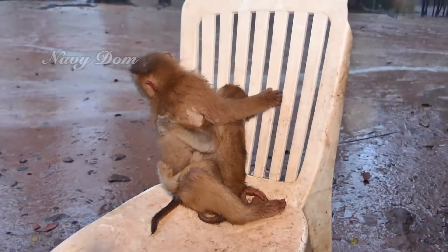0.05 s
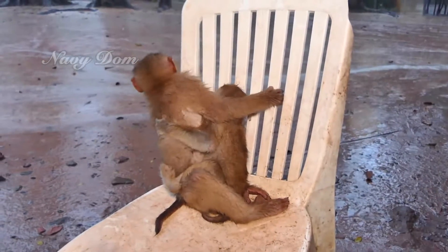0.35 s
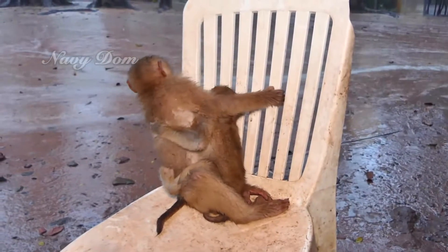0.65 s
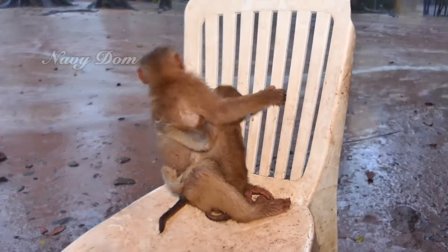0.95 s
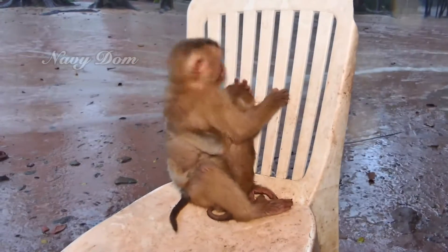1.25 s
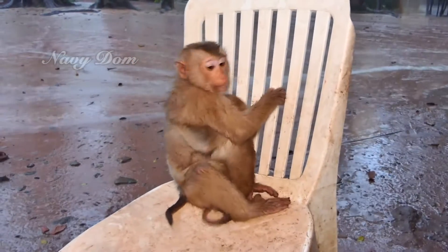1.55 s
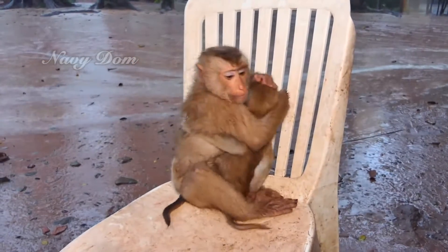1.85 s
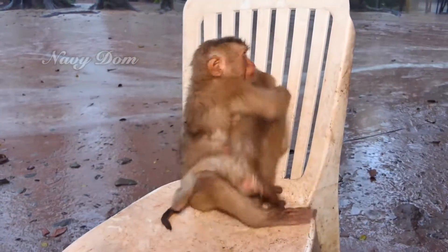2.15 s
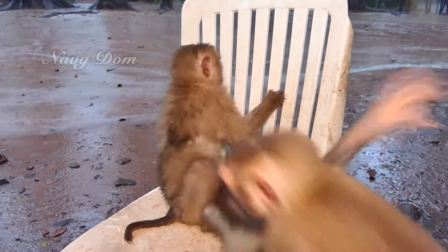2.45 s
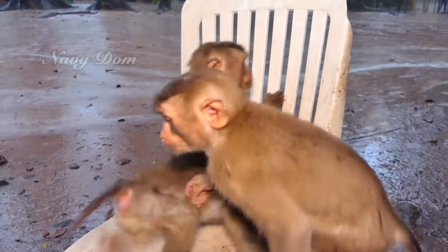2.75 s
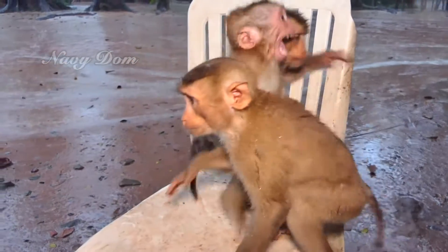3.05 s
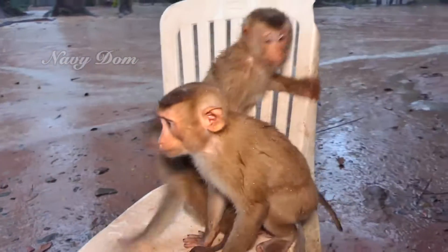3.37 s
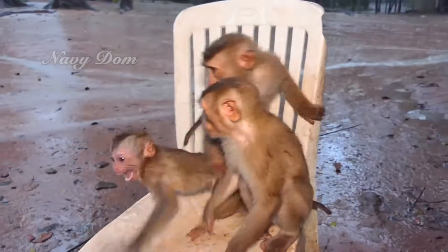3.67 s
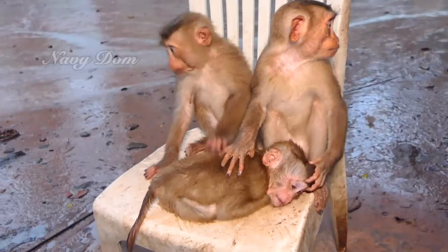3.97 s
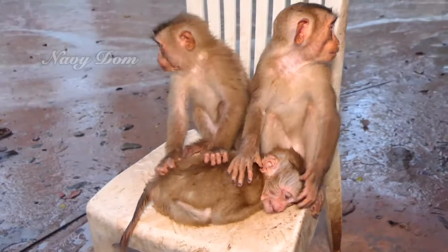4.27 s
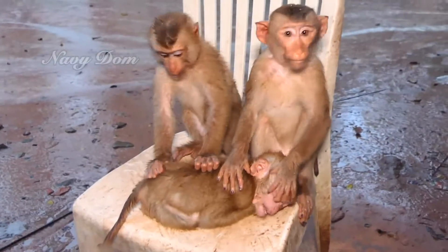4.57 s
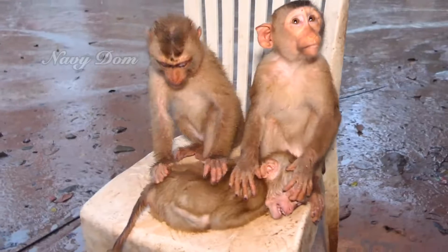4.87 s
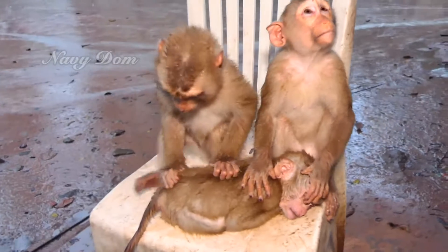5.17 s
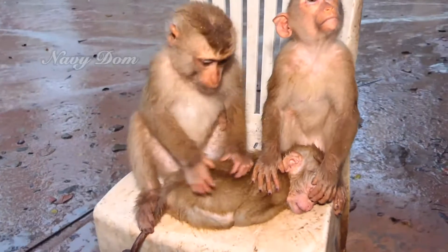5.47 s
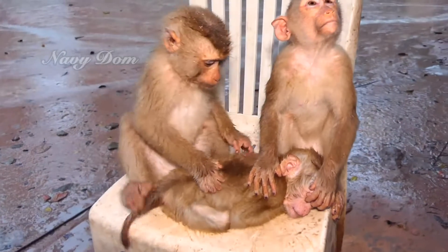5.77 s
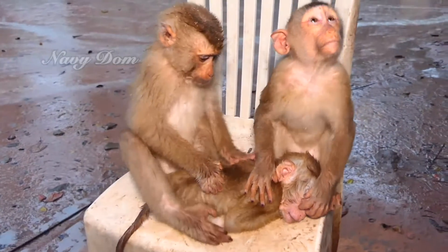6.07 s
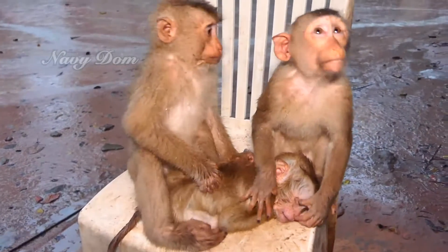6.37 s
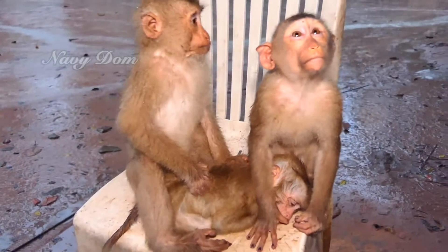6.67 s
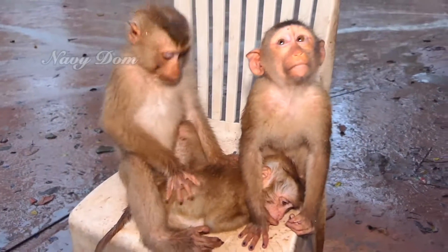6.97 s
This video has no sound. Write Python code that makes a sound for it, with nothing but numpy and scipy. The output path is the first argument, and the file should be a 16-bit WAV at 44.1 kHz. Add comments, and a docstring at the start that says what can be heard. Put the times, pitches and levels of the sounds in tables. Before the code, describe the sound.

Light rain falls steadily on a paved yard, with single drops ticking nearby. Close to the microphone, a baby monkey barks and breaks into a long shrill scream that flips between a whistle and a harsh rasp, then splits into quick yelps. Scuffling monkeys thump a plastic chair meanwhile. All sound cuts out for a moment, and two more short barks follow over the rain.

```python
"""Light rain, steady on a paved yard, all around the microphone; single drops tick nearby. Close by on the
porch a baby macaque, jostled by two older ones on a plastic chair, barks and breaks into a long shrill
scream that flips between a pure whistle and a harsh rasp as its throat strains, then breaks up into yelps.
The sound cuts out for a moment at the end of the scream; two more barks follow, the vocal folds snapping
and ringing the mouth. Feet and bodies thump the chair."""
import sys
import numpy as np
from scipy import signal
from scipy.fft import rfft, irfft, next_fast_len
from scipy.io import wavfile
from scipy.ndimage import uniform_filter1d, map_coordinates

SR = 44100
rng = np.random.default_rng(int(sys.argv[2]) if len(sys.argv) > 2 else 0)


def file_out(sig):
    """Save sig as 16-bit WAV at sys.argv[1]."""
    # one column per channel
    cols = np.atleast_2d(sig).T
    # limit, then scale
    lim = np.clip(cols, -1, 1)
    pcm = np.round(lim * 32767).astype(np.int16)
    wavfile.write(sys.argv[1], SR, pcm)


N = 314433
MUTE_START_S, MUTE_END_S = 3.938, 4.185

# low rush of the rain out in the yard: f/Hz, level/dB
RUSH_SPECTRUM = [(15, -75), (25, -30.5), (69, -25.5), (91, -10.5), (141, -11.5), (177, 0.5), (216, -2.5),
                 (253, -1), (289, -2.5), (405, 0.5), (517, -7.5), (648, -1.5), (868, -2.5), (1200, -5),
                 (1560, -27.5), (2640, -120)]
# hiss of the far drops: f/Hz, level/dB
HISS_SPECTRUM = [(710, -17), (1200, -5), (1350, -3), (1520, -3), (1900, -6), (3460, -7.5), (4200, -10.5),
                 (5610, -13), (8070, -21), (10500, -21), (14500, -35.5), (15500, -38.5)]
# how alike the rain is on the left and right of the microphone: f/Hz, likeness/0-1
STEREO_LIKENESS = [(60, 0.33), (130, 0.93), (290, 0.94), (640, 0.86), (1410, 0.64), (3100, 0.73),
                   (6820, 0.86), (15000, 0.26)]
# near drops on the paving: t/s, level/dB
NEAR_DROPS = [(0.4841, -25.5), (0.7345, -34), (1.3076, -32), (5.6523, -34.5), (5.7289, -29.5),
              (5.8074, -32), (6.8814, -44), (6.9242, -25)]
# ring of the porch: f/Hz, t60/s
PORCH_DECAY = [(200, 0.26), (2000, 0.2), (10000, 0.15)]
# blows on the chair: t/s, level/dB, slap offset/dB, hardness/(dB per octave)
CHAIR_BLOWS = [(1.909, -37, -1, 7.5), (2.03, -32, 5.5, -4), (2.478, -32, 6.5, -13), (2.653, -12.5, -11, -8),
               (2.777, -24.5, 0, -4), (2.885, -18, -6, -10), (3.054, -12.5, -18, -2.5),
               (3.428, -30, -1, 7.5), (3.492, -13, -19, -1.5), (3.597, -26.5, 6, 6), (3.648, -23.5, 4.5, 0),
               (3.888, -30, 1, 6), (5.401, -34.5, 0, 8), (5.593, -38, -10, 4)]
# modes of the chair: f/Hz, level/dB, t60/s
CHAIR_MODES = [(137, -8.5, 0.073), (198, 7.5, 0.051), (248, 3.5, 0.062), (291, 0.5, 0.063),
               (315.5, -0.5, 0.12), (402, -16.5, 0.15), (548, -7, 0.13), (777, -17.5, 0.11)]
# skin slapping on plastic: f/Hz, level/dB
SLAP_SPECTRUM = [(100, -14.5), (500, -6), (900, -1), (1500, -16.5), (3000, -13.5), (8000, -38.5),
                 (16000, -55.5)]
# bodies shuffling on the seat: t/s, level/dB
SHUFFLE_LEVELS = [(1.8, -61), (2.3, -43), (2.85, -38), (3.3, -45), (3.7, -36.5), (3.95, -47)]
# barks: t/s, hold/s, first and last mouth resonance/Hz, body/dB, swell over the hold/dB, rasp/dB
BARK_CALLS = [(1.746, 0.043, 2070, 2800, -22.5, -8.5, -29.5), (4.452, .083, 1790, 2235, -28, 7, -33),
              (5.028, 0.016, 1820, 1920, -27, 0, -43.5)]
# upper resonances of the throat in a bark: f/Hz, width/Hz, level/dB
THROAT_RESONANCES = [(5300, 1800, -2.5), (7410, 900, 1.5), (10000, 720, -5)]
# course of the held scream: t/s, pitch/Hz, level/dB
SCREAM_CONTOUR = [(1.76, 2884, -42), (1.79, 3640, -26), (1.822, 3440, -26), (1.88, 5110, -34),
                  (1.95, 5620, -36), (2.16, 5605, -33.5), (2.35, 5250, -34), (2.385, 5550, -30),
                  (2.56, 5660, -29), (2.695, 5750, -38.5), (2.718, 6400, -30), (2.76, 5736, -30.5),
                  (2.84, 5510, -30.5), (2.92, 6250, -26.5), (2.955, 5450, -28.5), (3.03, 5280, -33.5),
                  (3.12, 4900, -44)]
# the whistle slips down and back: t/s, length/s, pitch drop/share, gain/dB, overtone gain/dB
PITCH_SLIPS = [(2.164, .066, .145, 5.5, 5), (2.396, .066, .27, 3, -7), (2.477, .05, .09, -4, 5),
               (2.574, .04, .04, -2, 5.5)]
# surges of strain that turn the scream to a rasp: t/s, length/s, level/dB, overtones/dB, roughness
STRAIN_SURGES = [(1.772, 0.048, -25.5, -25, 0.63), (1.83, 0.049, -27, -28, .9),
                 (1.927, 0.084, -32.5, -31.5, 1.1), (2, 0.065, -30, -27, 0.83),
                 (2.054, .12, -34.5, -33, 1.04), (2.225, 0.065, -29.5, -33.5, 0.88),
                 (2.308, 0.031, -23.5, -30.5, 0.57), (2.449, 0.043, -24.5, -30.5, 1),
                 (2.522, .05, -28, -31.5, 1.1), (2.62, 0.059, -31, -24.5, 0.8),
                 (2.708, 0.052, -32.5, -28.5, 0.4), (2.775, 0.066, -29.5, -27.5, 0.9)]
# closing yelps: t/s, length/s, first pitch/Hz, pitch fall/share, level/dB, overtones/dB, roughness
YELP_CALLS = [(3.135, 0.086, 5250, 0.0097, -34.5, -37.5, .42),
              (3.223, .068, 5260, .055, -31.5, -38.5, 0.33), (3.313, .07, 5470, .11, -32.5, -34, .46),
              (3.412, .06, 5060, .1, -31.5, -33.5, .38), (3.551, 0.037, 4565, .06, -34, -44, 0.4),
              (3.637, .045, 4920, .17, -25.5, -31.5, .5), (3.715, .034, 4340, .07, -27, -47.5, 0.2),
              (3.783, .046, 4700, .11, -29, -39, .14), (3.839, 0.062, 4710, .035, -29.5, -34.5, .18),
              (3.9, .05, 4700, -.04, -33.5, -33.5, 0.8)]
# tone colour of the scream, with the microphone's dip near 8 kHz: f/Hz, gain/dB
SCREAM_COLOUR = [(1200, -46), (2700, -17.5), (4000, -3), (6300, -6.5), (7300, -4.5), (8200, -7), (9200, 2),
                 (10600, 6.5), (12800, 4.5), (15500, 3)]
# air torn through the strained throat: f/Hz, level/dB
BREATH_SPECTRUM = [(2000, -29), (4000, -5), (6500, -0.5), (8200, -8), (9500, -4), (12800, 0.5), (15500, -6)]


def amp(db):
    """Decibels to gain."""
    return 10 ** (np.asarray(db) / 20)


def unit(x):
    """Scale to rms 1."""
    return x / np.sqrt(np.mean(x ** 2) + 1e-20)


def along(points, hz):
    """Read (f/Hz, value) points on a log axis."""
    f, v = np.transpose(points)
    return np.interp(np.log(hz + 1), np.log(f), v)


def curves(rows):
    """One value per sample for each column after the time."""
    times, *columns = np.transpose(rows)
    return [np.interp(np.arange(N) / SR, times, column) for column in columns]


def between(start, end):
    """A gate with short soft edges."""
    t = np.arange(N) / SR
    return uniform_filter1d(1. * ((t > start) & (t < end)), size=64)


def swell(start, length, edge):
    """0 to 1 and back, with smooth edges centred on the start and the end."""
    t = np.arange(N) / SR
    inside = np.minimum(t - start, start + length - t)
    return .5 + .5 * np.sin(np.pi * np.clip(inside / edge, -.5, .5))


def toward(now, goal, weight):
    """Blend from one value to another."""
    return now + weight * (goal - now)


def wobble(rate):
    """A smooth random curve, rate knots a second."""
    return map_coordinates(rng.standard_normal(int(N * rate / SR) + 4), [np.arange(N) * rate / SR])


def filtered(x, response):
    """Filter x by a response given as a function of frequency."""
    size = next_fast_len(N + SR // 4)
    return irfft(rfft(x, size) * response(np.fft.rfftfreq(size, 1 / SR)), size)[..., :N]


def coloured(x, spectrum):
    """Shape x by (f/Hz, gain/dB) points."""
    return filtered(x, lambda hz: amp(along(spectrum, hz)))


def noise(spectrum):
    """Coloured noise of rms 1."""
    return unit(coloured(rng.standard_normal(N), spectrum))


def add(track, start, sound):
    """Mix a sound into a track, start seconds in."""
    part = track[max(round(start * SR), 0):][:len(sound)]
    part += sound[:len(part)]


def spread(pair, spectrum):
    """Two unrelated signals become a coloured, partly alike stereo pair of rms 1."""
    def response(hz):
        angle = np.arccos(np.clip(along(STEREO_LIKENESS, hz), -1, 1)) / 2
        return amp(along(spectrum, hz)) * [np.cos(angle), np.sin(angle)]

    mid, side = filtered(pair, response)
    return unit(np.array([mid + side, mid - side]))


def far_rain(rush_db=-40.5, hiss_db=-38.5, drift_db=.72, drops_per_s=900, patter=.45):
    """Out in the yard, all around: a low rush under the hiss and patter of many far drops."""
    rush = spread(rng.standard_normal((2, N)), RUSH_SPECTRUM) * amp(2.38 * wobble(45))
    hits = (rng.random((2, N)) < drops_per_s / SR) * rng.standard_normal((2, N))
    hits *= amp(4 * rng.standard_normal((2, N)))  # drops vary in size
    hiss = spread(rng.standard_normal((2, N)) + patter * unit(hits), HISS_SPECTRUM)
    hiss *= amp(.44 * wobble(22))
    lean_right = amp([[-.4], [.4]])
    return (amp(rush_db) * rush + amp(hiss_db) * hiss) * amp(drift_db * wobble(6)) * lean_right


def near_drops(t60=.024, gain_db=-8):
    """Single drops tick on the paving near the microphone."""
    bursts, t = np.zeros(N), np.arange(SR // 10) / SR
    for start, db in NEAR_DROPS:
        add(bursts, start, amp(db + gain_db - 60 * t / t60))
    return bursts * noise([(800, -26), (4000, 5), (8000, -2.5), (10500, -1.5), (15000, -15.5)])


def porch(direct, echo_s=.0069, echo_db=-6, tail_db=-16):
    """One strong near reflection, weak ones that shift as the monkeys move, and a short tail."""
    def reflect(impulse):
        return signal.fftconvolve(direct[None], impulse / np.linalg.norm(impulse[0]), axes=1)[:, :N]

    hz, t, bands = signal.stft(rng.standard_normal((2, SR // 4)), SR, nperseg=256)
    tail = signal.istft(bands * amp(-60 * t / along(PORCH_DECAY, hz)[:, None]), SR, nperseg=256)[1]
    wall_decay = np.exp(-np.arange(tail.shape[1]) / SR / .0032)
    walls = lambda: rng.standard_normal(tail.shape) * (rng.random(tail.shape) < .1) * wall_decay
    turn = 2 * wobble(5)
    shifting = np.cos(turn) * reflect(walls()) + np.sin(turn) * reflect(walls())
    shifting = coloured(shifting, [(300, -22), (1500, -7), (5000, -10), (11000, -5)])
    echo_colour = [(400, -12.5), (1500, -1), (3000, 1.5), (6000, -5)]
    echo = filtered(direct, lambda f: np.exp(-2j * np.pi * f * echo_s) * amp(along(echo_colour, f)))
    return direct + amp(echo_db) * echo + shifting + amp(tail_db) * reflect(tail)


def chair(ring_db=-5, slap_db=-7, slap_t60=.081, attack_s=.0022, low_cut_hz=118):
    """Close by, bodies thump the seat's modes, skin slaps the plastic and fur shuffles over it."""
    thumps, slaps, t = np.zeros(N), np.zeros(N), np.arange(SR // 3) / SR
    for start, db, slap_offset_db, hardness in CHAIR_BLOWS:
        ring = 0
        for hz, mode_db, t60 in CHAIR_MODES:
            # a soft blow reaches only the low modes
            struck_db = mode_db + hardness * np.log2(hz / 200) + rng.normal(0, 1)
            ring += amp(struck_db - 60 * t / t60) * np.sin(2 * np.pi * hz * t)
        add(thumps, start + .0019, amp(db + ring_db) * ring * (1 - np.exp(-t / attack_s)))
        add(slaps, start, amp(db + slap_offset_db + slap_db - 60 * t / slap_t60))
    shuffle = amp(curves(SHUFFLE_LEVELS)[0] + 3.7 * wobble(35))
    shuffle *= between(SHUFFLE_LEVELS[0][0], SHUFFLE_LEVELS[-1][0])
    fur = noise([(40, -32.5), (170, -5), (330, -6.5), (450, -9.5), (650, -5), (1400, -10.5),
                 (4000, -22), (12000, -18)])
    # the thumps are heard with little deep bass
    low_cut = signal.butter(4, low_cut_hz, "highpass", fs=SR, output="sos")
    return signal.sosfilt(low_cut, thumps + slaps * noise(SLAP_SPECTRUM) + shuffle * fur)


def bark_shapes(attack_s=.034, release_s=.053, depth_db=28.5, closing_hz_per_s=3500):
    """Mouth resonance, body and rasp level: attack, a hold as the mouth opens, release as it closes."""
    t = np.arange(N) / SR
    shapes = []
    for start, hold, first_hz, last_hz, body_db, swell_db, rasp_db in BARK_CALLS:
        opening = np.clip((t - start) / hold, 0, 1)
        before, after = np.maximum(start - t, 0), np.maximum(t - start - hold, 0)
        fade_db = -depth_db * ((before / attack_s) ** 2 + (after / release_s) ** 2)
        mouth_hz = toward(first_hz, last_hz, opening) - closing_hz_per_s * np.minimum(after, release_s)
        shapes.append([mouth_hz, body_db + swell_db * opening + fade_db, rasp_db + fade_db])
    shapes = np.array(shapes)
    loudest = shapes[:, 1].argmax(axis=0)
    return shapes[loudest, :, np.arange(N)].T


def throat(hz):
    """Response of the upper throat: resonances of alternating sign."""
    return sum((-1) ** k * amp(db) * 1j * hz * width / (centre ** 2 - hz ** 2 + 1j * hz * width)
               for k, (centre, width, db) in enumerate(THROAT_RESONANCES))


def barks(pulse_hz=410, width_hz=480, air=.9):
    """Irregular snaps of the vocal folds ring the gliding mouth resonance and the upper throat."""
    mouth_hz, body_db, rasp_db = bark_shapes()
    cycles = np.cumsum(pulse_hz * np.exp(.25 * wobble(500))) / SR
    snaps = np.flatnonzero(np.diff(np.floor(cycles)) > 0)
    strength, detune, offset = rng.standard_normal((len(snaps), 3)).T
    size = amp(1.5 * strength)
    t = np.arange(256) / SR
    ring_hz = mouth_hz[snaps] * np.exp(.092 * detune)
    phase = 2 * np.pi * ring_hz[:, None] * t + .5 * offset[:, None]
    rings = size[:, None] * np.exp(-np.pi * width_hz * t) * (1 - np.exp(-t / .00019)) * np.sin(phase)
    body = np.bincount((snaps[:, None] + np.arange(len(t))).ravel(), rings.ravel(), N)[:N]
    body_colour = [(500, -20), (1000, -1.5), (1400, 1), (2000, -1), (3100, 4), (4200, 4), (9000, -.5)]
    pulses = np.bincount(snaps, size, N)
    # air rushes through the folds at each opening
    puffs = signal.lfilter([1], [1, -np.exp(-1 / (.003 * SR))], pulses) * rng.standard_normal(N)
    rasp = unit(filtered(.3 * unit(pulses) + air * unit(puffs), throat))
    return amp(body_db) * unit(coloured(body, body_colour)) + amp(rasp_db) * rasp


def yelps(sag=.07, edge_s=.04):
    """Pitch, roughness, level and overtones of the yelps: each swells out of a lull, its pitch arched."""
    t = np.arange(N) / SR
    pitch = SCREAM_CONTOUR[-1][1]
    rough, level_db, overtone_db = .45, -45.5, -56.5  # the voice between yelps
    for start, length, first_hz, fall, db, high_db, harsh in YELP_CALLS:
        progress = np.clip((t - start) / length, -.2, 1.2)
        arch = first_hz * (1 - fall * progress - sag * (progress - .5) ** 2)
        pitch = toward(pitch, arch, np.clip(2 * (t - start) / edge_s + 1, 0, 1))
        effort = swell(start, length, edge_s)
        rough = toward(rough, harsh, effort)
        level_db = toward(level_db, db, effort)
        overtone_db = toward(overtone_db, high_db, effort)
    return np.array([pitch, rough, level_db, overtone_db])


def held_scream(flip_s=.026):
    """Pitch, roughness, level and overtones of one long whistle that slips down and surges into rasps."""
    pitch, level_db = curves(SCREAM_CONTOUR)
    rough, overtone_db = .24, level_db - 4  # the unstrained voice
    for start, length, drop, gain_db, high_db in PITCH_SLIPS:
        slip = swell(start + length / 4, length / 2, length / 2)
        pitch *= 1 - drop * slip
        level_db += gain_db * slip
        overtone_db += high_db * slip
    for start, length, db, high_db, harsh in STRAIN_SURGES:
        strain = swell(start, length, flip_s)
        rough = toward(rough, harsh, strain)
        level_db = toward(level_db, db, strain)
        overtone_db = toward(overtone_db, high_db, strain)
    return np.array([pitch, rough, level_db, overtone_db])


def scream(flutter_hz=790, hoarse=1.1, jitter=.0082, quaver=.016, quiver_db=1.5, third_db=-14, air_db=-1):
    """The baby's whistle, close up; strain turns it hoarse, a slower vibration and chaos add sidebands."""
    held = np.arange(N) / SR < SCREAM_CONTOUR[-1][0]
    pitch, rough, level_db, overtone_db = np.where(held, held_scream(), yelps())
    rough = np.clip(rough, 0, 1)
    phase = 2 * np.pi * np.cumsum(pitch * (1 + jitter * wobble(250) + quaver * wobble(55))) / SR
    flutter = 2 * np.pi * np.cumsum(flutter_hz * (1 + .11 * wobble(70))) / SR
    noise_band = lambda angle, width: wobble(width) * np.sin(angle) + wobble(width) * np.cos(angle)
    levelled = lambda x: x / np.sqrt(np.abs(uniform_filter1d(x ** 2, size=700)) + 1e-6)

    def harmonic(k):
        """A clean line that blurs, flanked by sidebands and a broad rasp; higher ones blur sooner."""
        blur = np.clip(np.sqrt(k) * hoarse * rough + .15, 0, .97)
        core = np.sqrt(1 - blur ** 2) * np.sin(k * phase) + blur * noise_band(k * phase, 700 * k)
        sides = sum(noise_band(k * phase + n * flutter, 170 * k) / abs(n) for n in (-2, -1, 1, 2))
        chaos = noise_band(k * phase, 2600 * k)
        return (1 - .55 * rough) * core + .6 * rough ** 2 * sides + .58 * k ** .6 * rough * chaos

    third = harmonic(3) * (3 * pitch < SR * .4)
    fundamental = levelled(coloured(harmonic(.99), SCREAM_COLOUR))
    breath = amp(air_db) * rough * noise(BREATH_SPECTRUM)
    overtones = levelled(coloured(harmonic(2) + amp(third_db) * third, SCREAM_COLOUR))
    voice = amp(level_db) * fundamental + amp(overtone_db) * levelled(overtones + breath)
    unsteady_effort = amp(1.2 * rough * wobble(220) + quiver_db * wobble(60))
    return voice * unsteady_effort * between(SCREAM_CONTOUR[0][0], MUTE_START_S)


def scene():
    """Monkeys and chair on the porch, close to the microphone; the rain all around."""
    return porch(scream() + barks() + chair() + near_drops()) + far_rain()


def record(dry, low_hz=32, top_hz=15830):
    """At the microphone: the sound cuts out briefly; deep bass and the highest treble are lost."""
    interrupted = dry * (1 - between(MUTE_START_S, MUTE_END_S))
    return filtered(interrupted, lambda hz: (hz < top_hz) * hz ** 2 / (hz ** 2 + low_hz ** 2))


dry = scene()
out = record(dry)
file_out(out)
```